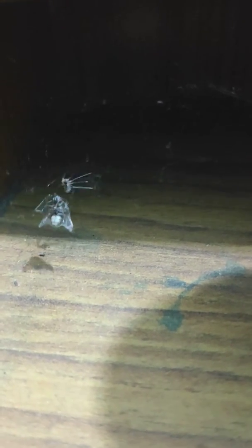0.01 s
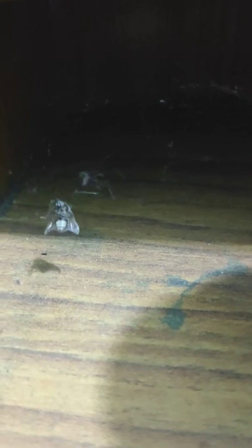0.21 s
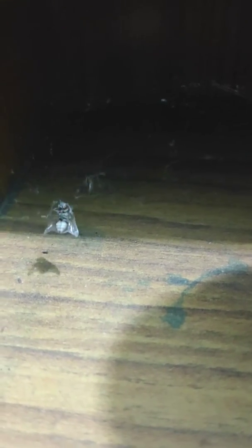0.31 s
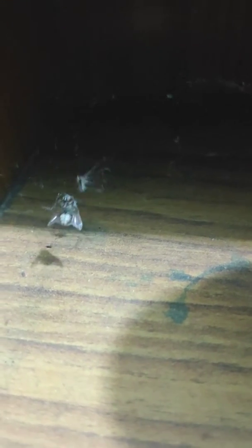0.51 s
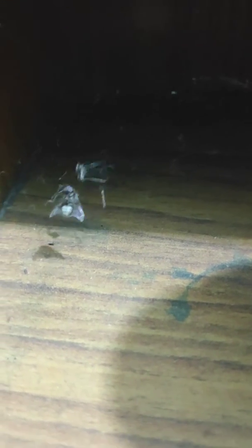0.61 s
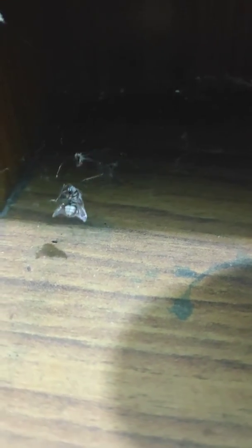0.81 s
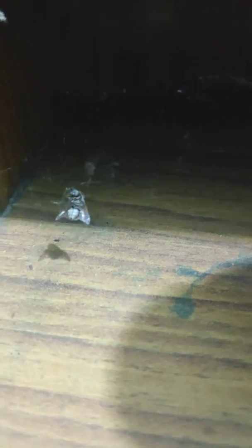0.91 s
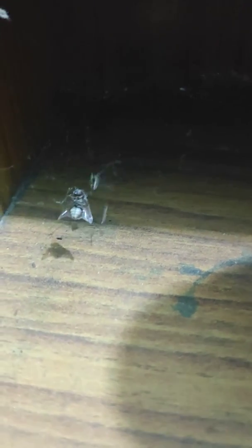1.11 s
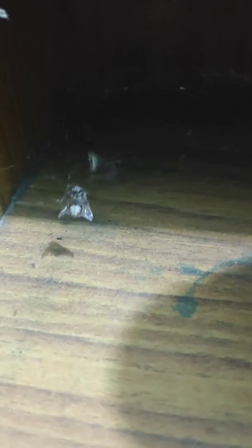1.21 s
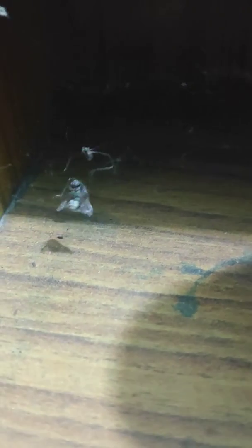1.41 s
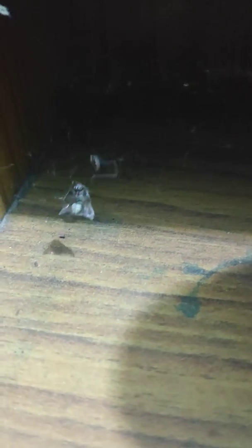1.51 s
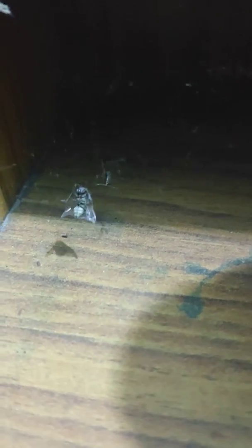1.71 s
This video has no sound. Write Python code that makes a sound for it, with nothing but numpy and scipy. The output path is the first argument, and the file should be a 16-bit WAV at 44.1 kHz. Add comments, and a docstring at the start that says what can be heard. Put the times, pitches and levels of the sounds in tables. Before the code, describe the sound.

Fingers bump and shift on a camera's case, low thuds close on the left, faint hiss beneath

```python
"""Fingers shift on the case of a camera held in a quiet room, nearly all in the left microphone.
Each bump adds a short snap, a knock and a low thump; shaped noise makes the rumble and drag of the hand.
Far below lie hiss (noise), a low hum (steady sines) and a faint thin whine (narrow noise and a wavering tone).
On the right, a narrow band of noise pulses about five times a second as an electronic sizzle."""
import sys
import numpy as np
from scipy import signal
from scipy.fft import rfft, irfft
from scipy.io import wavfile

SR = 44100
rng = np.random.default_rng(int(sys.argv[2]) if len(sys.argv) > 2 else 0)


def unload_audio(sound):
    """Save the sound as a 16-bit wav file, at the path given as the first command line argument."""
    columns = np.transpose(np.atleast_2d(sound))
    # keep every value between -1 and 1, then stretch to whole-number steps
    steps = np.round(np.clip(columns, -1, 1) * 32767)
    wavfile.write(sys.argv[1], SR, steps.astype(np.int16))


N = 77175

# trembling grip: [t/s, level/dB]
GRIP_LEVEL = [(0, -37.5), (.15, -55), (.24, -39), (.5, -35.5), (.7, -39.5), (.9, -39), (1.08, -39.5),
              (1.22, -41), (1.36, -43), (1.48, -28.5), (1.58, -42.5), (1.75, -45)]
# tone colour of the grip's rumble: [f/Hz, relative level/dB]
RUMBLE_COLOUR = [(10, 6), (25, 4.5), (50, -0.5), (85, -3), (130, -11), (200, -23), (300, -34.5), (450, -45),
                 (800, -54.5), (2000, -80.5)]
# fingers dragging over the case: [t/s, level/dB]
DRAG_LEVEL = [(0, -79.5), (.85, -77), (1.02, -65), (1.25, -67.5), (1.32, -44), (1.5, -54), (1.6, -60.5),
              (1.75, -80)]
# tone colour of the drag: [f/Hz, relative level/dB]
DRAG_COLOUR = [(40, -19.5), (100, -4.5), (150, 0.5), (200, -9), (300, -26), (600, -49.5), (2000, -75)]
# tones of the room hum on the right: [f/Hz, level/dB]
HUM_TONES = [(48, -72), (99, -69), (400, -84.5), (2800, -99)]
# tone colour of each microphone's hiss: [f/Hz, relative level/dB]
LEFT_HISS_COLOUR = [(20, 7.5), (300, 12), (550, 9), (1000, 2), (2000, 0), (5000, -3), (10000, -3.5),
                    (16000, -2)]
RIGHT_HISS_COLOUR = [(5, 44.5), (20, 32), (50, 30), (72, 23.5), (140, 17), (280, 16.5), (550, 10),
                     (1000, 6), (2000, 1.5), (4500, -0.5), (7000, 2.5), (10000, -2), (16000, -2)]
# bumps on the case: [t/s, thump level/dB, thump f/Hz, knock level/dB, knock f/Hz,
# snap level/dB, snap f/Hz, way (1 = finger lands, -1 = lets go)]
BUMPS = [(.053, -37, 58, -46.5, 163, -78, 800, 1), (.208, -38, 41.9, -49.5, 329, -62, 714, 1),
         (0.2302, -22, 59.7, -26, 163, -37.5, 877, 1), (0.2458, -23.5, 42, -37.5, 194, -56, 700, 1),
         (0.2822, -34, 39.9, -36, 260, -55, 624, 1), (0.2923, -7, 68, -15.5, 173, -21, 597, 1),
         (0.3128, -12.5, 63.2, -25, 197, -41, 610, 1), (0.3493, -16, 68.6, -25.5, 250, -51, 733, 1),
         (.366, -20.5, 54.6, -25, 226, -52, 776, -1), (0.4263, -25, 47.4, -31.5, 213, -52.5, 564, 1),
         (0.4472, -17.5, 65.3, -31, 250, -54, 670, 1), (0.4621, -23.5, 34.3, -32, 233, -63, 674, 1),
         (0.4782, -46.5, 70, -32, 226, -52, 738, -1), (0.4859, -22, 44.9, -23.5, 99, -50.5, 490, 1),
         (.494, -17, 59.7, -23.5, 226, -43.5, 610, 1), (0.5517, -24.5, 52.7, -36, 224, -49.5, 517, -1),
         (0.5934, -27, 67.5, -40.5, 251, -63, 647, 1), (.7021, -11, 62.7, -18, 232, -47, 1020, 1),
         (0.8476, -17, 62, -28.5, 225, -54.5, 680, 1), (1.022, -36, 50, -49.5, 240, -80, 800, 1),
         (1.106, -32, 53, -55, 257, -84, 800, 1), (1.406, -27, 55.3, -57, 170, -78, 780, 1),
         (1.4705, -18.5, 59.4, -12.5, 285, -34.5, 750, -1), (1.5259, -27.5, 49, -33, 220, -56, 700, -1),
         (1.6593, -39, 60, -40.5, 198, -59.5, 543, 1), (1.6644, -31, 69, -34.5, 161, -47, 590, 1)]
# ringing tones of the tick: [f/Hz, level/dB, time to die by 60 dB/s]
TICK_MODES = [(680, -27.5, 0.012), (1630, -43, 0.0066), (6000, -45.5, 0.0053), (11900, -47.5, 0.0041)]
# fuzzy bands of the whine on the right: [f/Hz, width/Hz, level at loudest/dB, loudest t/s, spread/s]
WHINE_BANDS = [(595, 70, -76, 0.43, 0.065), (505, 50, -76, 1.2, 0.28), (275, 100, -75, 1.1, 0.18),
               (1067, 81, -81, 1.23, 0.26), (1250, 38, -85, .98, .16), (1684, 18, -87, 1.38, .3)]
# clear tone inside the whine, on the right: [t/s, level/dB]
CORE_LEVEL = [(0, -110), (1.05, -89), (1.22, -76), (1.36, -76.5), (1.5, -71), (1.62, -79), (1.75, -81)]

BLEED_DB = -48.5  # how much of the handling reaches the right microphone
HUM_LEFT_DB, WHINE_LEFT_DB = -9.5, -14.5  # left level compared with the right
LEFT_HISS_DB, RIGHT_HISS_DB = -72, -62
SIZZLE_HZ, SIZZLE_WIDTH_HZ, SIZZLE_DB = 5730, 210, -80.5
SIZZLE_FIRST_S, SIZZLE_PERIOD_S = 0.14, 0.1935  # middle of a pulse, time between pulses
SIZZLE_EDGE = 5.3  # higher = more sudden on and off
THUMP_FOCUS, KNOCK_FOCUS, SNAP_FOCUS = 2.87, 4.85, 8.6  # higher = narrower band, more swings
THUMP_LAG_CYCLES = 0.24  # the case gives way just after the contact
SNAP_LEAD_S = 0.0004  # the snap of first touch comes just before the knock
RING_HZ, RING_DB, RING_T60_S = 81.6, -11.5, 0.09  # swing of the held case; level compared with its thump
TICK_RISE_CYCLES = 0.94  # each tick tone builds up over about this many swings
CORE_HZ, CORE_WAVER_HZ, WAVER_RATE_HZ = 561, 6, 12  # pitch, typical wander, how fast it wanders
EDGE_HZ = 15800  # top of the recorder's range

T = np.arange(N) / SR
FREQS = np.fft.rfftfreq(N, 1 / SR)


def amp(db):
    """Turn decibels into a gain."""
    return 10 ** (np.asarray(db) / 20)


def level(points):
    """Draw a gain over time through (t/s, level/dB) points."""
    times, db = np.transpose(points)
    return amp(np.interp(T, times, db))


def noise(gain):
    """Shape noise with a gain at each frequency, then scale it to an rms of 1."""
    white = rng.standard_normal(N)
    shaped = irfft(rfft(white) * gain, N)
    return shaped / shaped.std()


def coloured(points):
    """Make noise whose tone colour follows (f/Hz, relative level/dB) points."""
    hz, db = np.transpose(points)
    # even steps of pitch rather than of Hz; the 1 avoids log(0)
    return noise(amp(np.interp(np.log(FREQS + 1), np.log(hz + 1), db)))


def band(hz, width_hz):
    """Make noise around one resonance; its gain halves 0.95 widths from the centre."""
    distance = (FREQS - hz) / (0.95 * width_hz)
    return noise(1 / (1 + distance ** 2))


def pulse(t, hz, focus):
    """Make a short pulse centred on hz: its real part is a peak, its imaginary part a push and rebound."""
    return (1 - 2j * np.pi * hz * t / focus) ** -(focus + 1)


def mode(t, hz, t60, rise_s):
    """Ring like a struck object: a sine starts softly at t = 0 and dies by 60 dB in t60 seconds."""
    t = np.maximum(t, 0)
    rise = 1 - np.exp(-(t / rise_s) ** 2)
    decay = np.exp(-np.log(1000) * t / t60)
    return rise * decay * np.sin(2 * np.pi * hz * t)


def grip():
    """The trembling hand shakes the case, heard as low noise with a changing level."""
    return level(GRIP_LEVEL) * coloured(RUMBLE_COLOUR)


def drag():
    """Fingers rub over the case, heard as dull noise that swells and fades."""
    return level(DRAG_LEVEL) * coloured(DRAG_COLOUR)


def hum():
    """Steady faint sines of the room, each starting at a random point in its swing."""
    right = np.zeros(N)
    for hz, db in HUM_TONES:
        # sqrt(2) gives the sine an rms of 1
        right += amp(db) * np.sqrt(2) * np.sin(2 * np.pi * (hz * T + rng.random()))
    return np.array([amp(HUM_LEFT_DB) * right, right])


def hiss():
    """Each microphone has its own steady noise, unrelated to the other's."""
    left = amp(LEFT_HISS_DB) * coloured(LEFT_HISS_COLOUR)
    right = amp(RIGHT_HISS_DB) * coloured(RIGHT_HISS_COLOUR)
    return np.array([left, right])


def sizzle():
    """A narrow band of noise is switched on and off by a squared-off cosine, on the right only."""
    cycle = np.cos(2 * np.pi * (T - SIZZLE_FIRST_S) / SIZZLE_PERIOD_S)
    gate = (1 + np.tanh(SIZZLE_EDGE * cycle)) / 2
    right = amp(SIZZLE_DB) * gate * band(SIZZLE_HZ, SIZZLE_WIDTH_HZ)
    return np.array([np.zeros(N), right])


def bumps():
    """Each bump is a snap of contact, a dull knock, and a slower push and rebound that leaves the case swinging."""
    out = np.zeros(N)
    for s, thump_db, thump_hz, knock_db, knock_hz, snap_db, snap_hz, way in BUMPS:
        t = T - s
        snap = amp(snap_db) * pulse(t + SNAP_LEAD_S, snap_hz, SNAP_FOCUS).imag
        knock = amp(knock_db) * pulse(t, knock_hz, KNOCK_FOCUS).real
        late = t - THUMP_LAG_CYCLES / thump_hz
        push = pulse(late, thump_hz, THUMP_FOCUS).imag
        swing = amp(RING_DB) * mode(late, RING_HZ, RING_T60_S, 0.5 / RING_HZ)
        thump = amp(thump_db) * (push + swing)
        # letting go flips the snap and knock, but not the thump
        out += np.sign(way) * (snap + knock) - thump
    return out


def tick():
    """The bump with the loudest thump makes the case tick in a few quickly dying tones."""
    hardest = max(BUMPS, key=lambda row: row[1])
    t = T - hardest[0] + SNAP_LEAD_S
    return sum(amp(db) * mode(t, hz, t60, TICK_RISE_CYCLES / hz) for hz, db, t60 in TICK_MODES)


def whine():
    """Fuzzy bands of noise swell and fade at their own times, joined by one clear, wavering tone."""
    right = np.zeros(N)
    for hz, width_hz, db, loudest_s, spread_s in WHINE_BANDS:
        swell = np.exp(-((T - loudest_s) / spread_s) ** 2 / 2)
        right += amp(db) * swell * band(hz, width_hz)
    # slow noise pushes the pitch up and down
    core_hz = CORE_HZ + CORE_WAVER_HZ * band(0, WAVER_RATE_HZ)
    core = np.sqrt(2) * np.sin(2 * np.pi * np.cumsum(core_hz) / SR)
    right += level(CORE_LEVEL) * core
    return np.array([amp(WHINE_LEFT_DB) * right, right])


def scene():
    """Add the handling, mostly on the left, to the faint sounds beneath it."""
    handling = grip() + drag() + bumps() + tick()
    handling_stereo = np.array([handling, amp(BLEED_DB) * handling])
    return handling_stereo + hum() + hiss() + sizzle() + whine()


def record(dry):
    """The recorder's band limit: a low-pass filter removes the highest treble."""
    low_pass = signal.firwin(511, EDGE_HZ, window=("kaiser", 9), fs=SR)
    return signal.oaconvolve(dry, low_pass[None], "same")


dry = scene()
out = record(dry)
unload_audio(out)
```